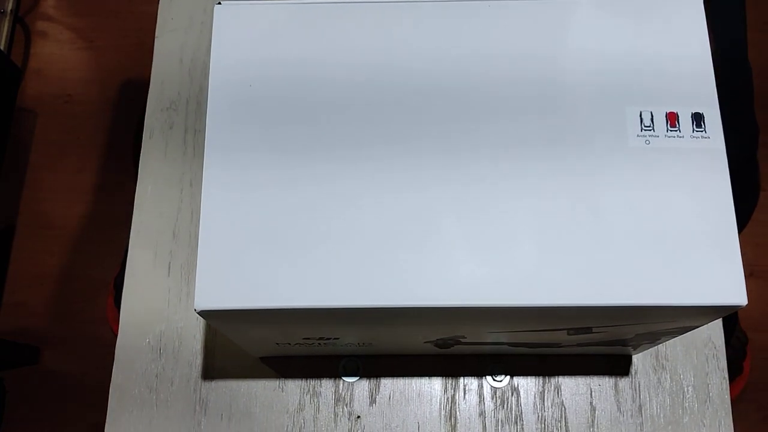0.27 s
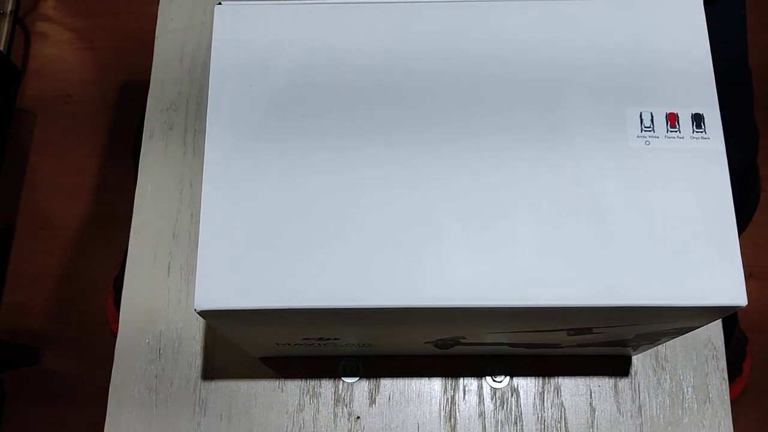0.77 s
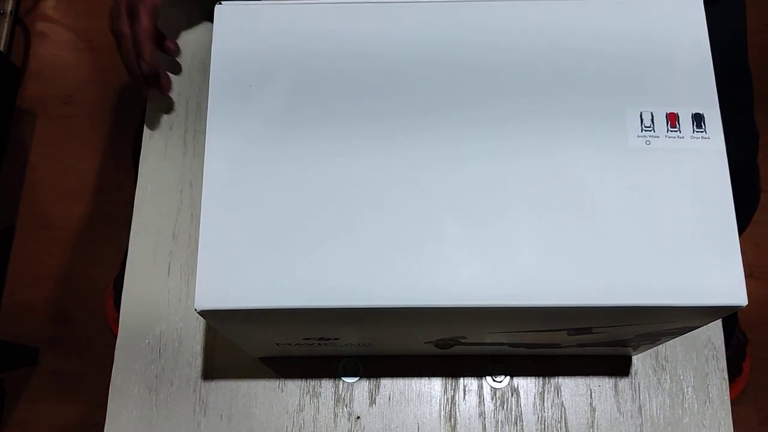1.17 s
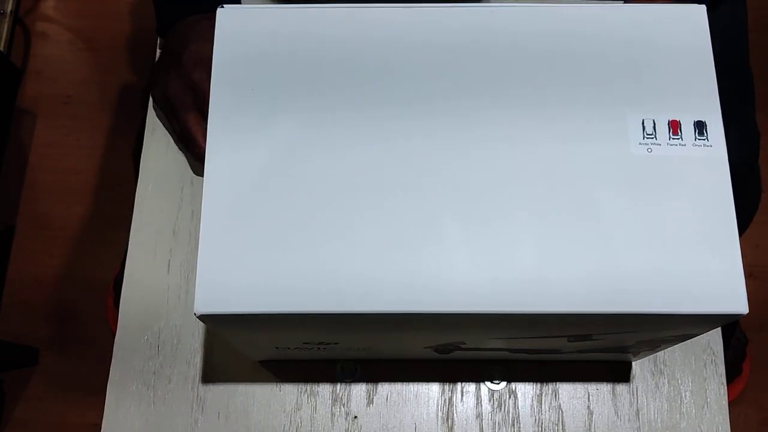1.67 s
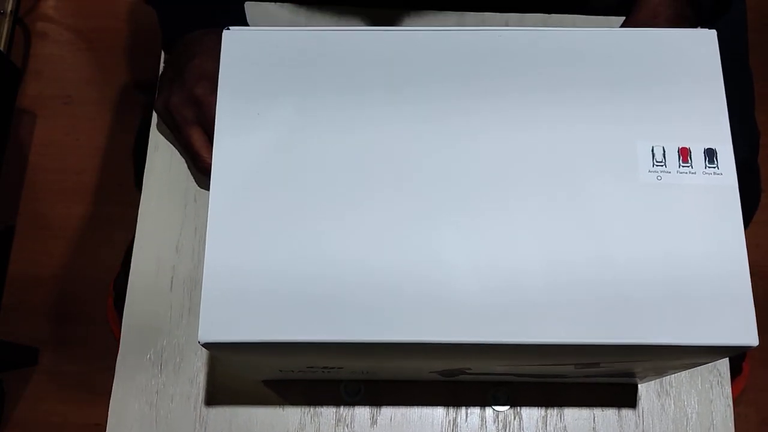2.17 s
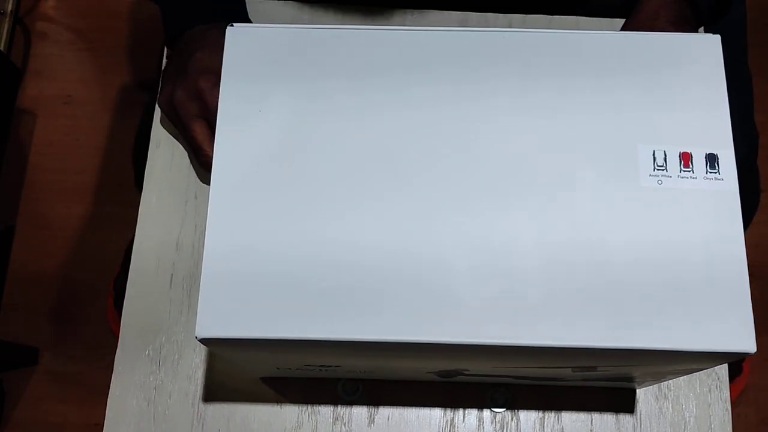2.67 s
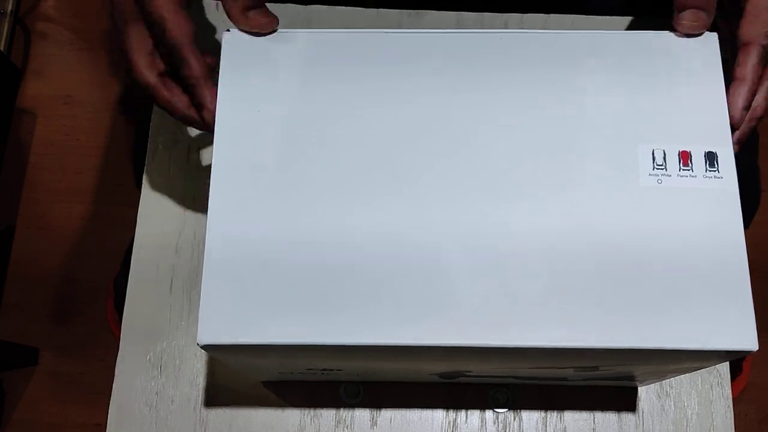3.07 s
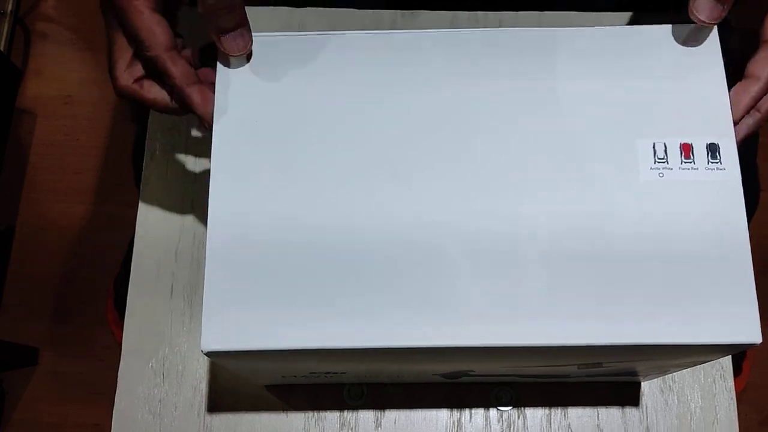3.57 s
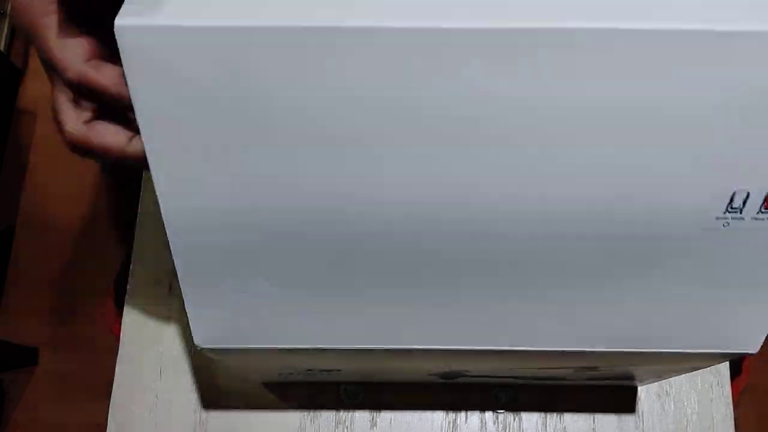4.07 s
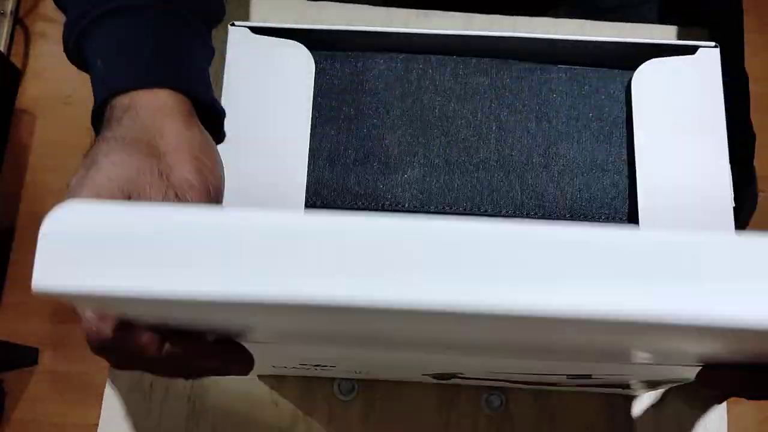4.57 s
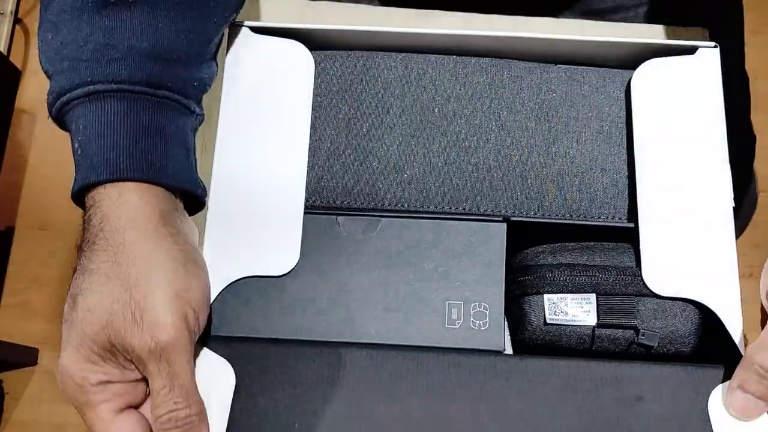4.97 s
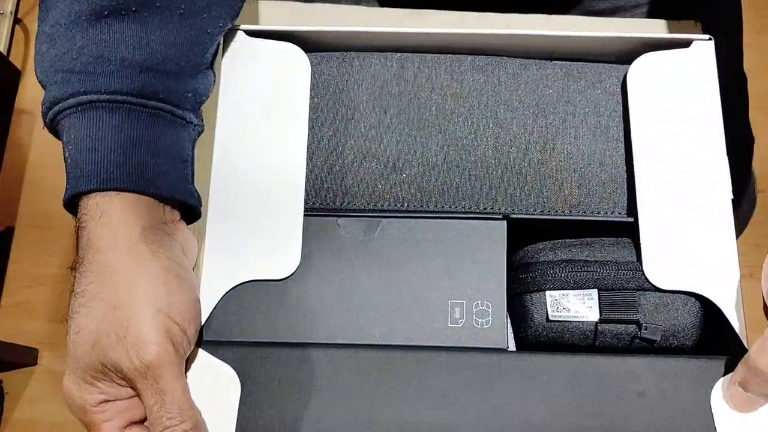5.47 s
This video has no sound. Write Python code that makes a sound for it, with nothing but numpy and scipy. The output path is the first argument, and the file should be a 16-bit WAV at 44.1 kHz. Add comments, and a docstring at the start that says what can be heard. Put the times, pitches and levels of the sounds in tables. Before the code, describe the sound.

Hands knock, slap and rub a hollow cardboard box in a quiet room, with one loud crackling burst of blows as the lid comes free.

```python
"""Hands knock, slap and slide on a hollow cardboard box in a quiet furnished room, close to a phone microphone.
Knocks at 0.1 s and a sharp slap near 0.3 s lead to faint rubbing, a lone knock at 2 s and stronger rubbing
from 2.7 s; the loudest burst of blows comes at 3.7 s, then scattered knocks and strokes, a hollow thud at 5.2 s
and two last rubs. Blows ring box modes under cracks of noise; strokes are stuttering friction noise; paper snaps
are short pitched puffs. A decaying tail of taps is the room, over steady drifting room tone."""
import sys
import numpy as np
from scipy import signal
from scipy.fft import rfft, irfft, next_fast_len
from scipy.io import wavfile
from scipy.ndimage import uniform_filter1d

SR = 44100
rng = np.random.default_rng(int(sys.argv[2]) if len(sys.argv) > 2 else 0)


def master_out(mix):
    """Clip the mix to full scale and print it as 16-bit PCM to the path in sys.argv[1]."""
    frames = np.transpose(np.atleast_2d(mix))
    ceiling = np.clip(frames, -1, 1)
    pcm = np.round(ceiling * 32767).astype(np.int16)
    wavfile.write(sys.argv[1], SR, pcm)


N = 252693  # length in samples


def gain_of(db):
    """Level law: decibels to an amplitude factor."""
    return 10 ** (np.asarray(db) / 20)


def evened(x):
    """Power normalisation: scales to rms 1."""
    return x / np.sqrt(np.mean(x ** 2) + 1e-20)


def read(points, hz):
    """Interpolation on a logarithmic frequency axis, as pitch is heard."""
    f, value = np.transpose(points)
    return np.interp(np.log(hz + 1), np.log(f + 1), value)


def add(mix, s, sound):
    """Superposition: mixes a sound in at time s."""
    part = mix[round(s * SR):][:len(sound)]
    part += sound[:len(part)]


def coloured(x, points, tilt_db=0.):
    """Spectral shaping: filters x to a spectrum, tilted in dB an octave about 3 kHz, rms 1."""
    size = next_fast_len(len(x))
    hz = np.fft.rfftfreq(size, 1 / SR)
    shape_db = read(points, hz) + tilt_db * np.log2((hz + 100) / 3000)
    return evened(irfft(rfft(x, size) * gain_of(shape_db), size)[:len(x)])


def ring(x, hz, t60):
    """Damped resonance: one mode, in which a click of height 1 rings at height 1."""
    radius = 10 ** (-3 / (t60 * SR))
    w = 2 * np.pi * hz / SR
    return signal.lfilter([0, np.sin(w)], [1, -2 * radius * np.cos(w), radius * radius], x)


def rung(force, hz, t60):
    """Forced resonance: a mode rung by a force, peak 1."""
    x = ring(force, hz, t60)
    return x / abs(x).max()


def through(x, modes):
    """Modal superposition: steady drive of a set of modes, rms 1."""
    return evened(sum(gain_of(db) * evened(ring(x, hz, t60)) for hz, db, t60 in modes))


# spectrum of the room tone: pitch_hz [Hz], level_db [dB per Hz, relative]
AIR = [(25, -31.5), (60, -17.5), (115, 3.5), (200, -10), (300, -9), (500, -14), (800, -21), (1500, -25),
       (3000, -28.5), (6500, -31.5), (7300, -37.5), (8000, -48), (15500, -38.5), (16500, -52)]
AIR_DB = -59.5  # rms level


def air():
    """Stationary noise: room tone whose level drifts in patches of time and frequency."""
    frames, hz = N // 256 + 5, np.fft.rfftfreq(1024, 1 / SR)
    real, imag, patches = rng.standard_normal((frames, 513, 3)).T
    patches = uniform_filter1d(patches, size=10, axis=0)  # over frequency
    patches = evened(uniform_filter1d(patches, size=12, axis=1))  # over time
    level_db = read(AIR, hz)[:, None] + 1.5 * patches
    z = (real + 1j * imag) * gain_of(level_db)
    tone = signal.istft(z, nperseg=1024, noverlap=768)[1][:N]
    return gain_of(AIR_DB) * evened(tone)


# decay of the furnished room: pitch_hz [Hz], t60_s [s]
ROOM = [(150, 0.13), (1000, 0.059), (4000, 0.023), (12000, 0.36)]


def room(x):
    """Reverberation: sparse taps of random sign, each band decaying exponentially at its own speed."""
    taps = np.zeros(SR // 2)
    at = np.arange(200, len(taps) - 20, 20)
    jitter = rng.integers(0, 20, len(at))
    taps[at + jitter] = rng.choice([-1., 1.], len(at))
    hz, t, z = signal.stft(taps, SR, nperseg=256)
    decay_db = -60 * t / read(ROOM, hz)[:, None]
    tail = signal.istft(z * gain_of(decay_db), SR, nperseg=256)[1]
    return signal.fftconvolve(x, tail / np.linalg.norm(tail))[:N]


def snap(db, hz, t60):
    """Stress release: a fibre lets go in a short puff with one broad pitch."""
    t = np.arange(SR // 8) / SR
    noise = rng.standard_normal(len(t))
    pitched = evened(ring(ring(noise, hz, .0022), hz, .0022))
    puff = evened(.4 * coloured(noise, CRACK) + pitched)
    rise = np.minimum(t / .001, 1)
    return gain_of(db - 60 * t / max(t60, .004)) * rise * puff


# small snaps of the paper face: start_s [s], level_db [dB], pitch_hz [Hz], t60_s [s]
SNAPS = [(.2551, -40, 6400, .012), (.426, -38.5, 4460, 0.076), (0.4933, -43.5, 5800, .02),
         (0.6833, -51.5, 4600, .021), (.9394, -58.5, 3350, .025), (1.1125, -51.5, 1700, .025),
         (1.727, -49.5, 2100, .023), (1.973, -44, 5500, .06), (2.17, -54.5, 6140, .018),
         (2.758, -52, 6340, .015), (3.101, -50, 6560, .029), (3.4706, -40.5, 6640, .025),
         (3.5771, -37, 4600, .023), (3.5958, -34, 4400, .02), (4.0796, -46, 3440, .03),
         (4.3994, -47, 2240, .022), (4.5323, -47, 6340, .025), (5.31, -45.5, 5700, .027),
         (5.6245, -54, 5270, .03)]


def snaps(mix):
    """Superposition of independent stress releases in the paper face."""
    for s, *how in SNAPS:
        add(mix, s, snap(*how))


def grit(lumpy_db, catch_s):
    """Stick-slip friction: noise whose strength stutters as fibres catch and let go."""
    stutter = evened(uniform_filter1d(rng.standard_normal(N), max(round(catch_s * SR), 1)))
    return rng.standard_normal(N) * gain_of(lumpy_db * stutter)


STROKE_DEPTH_DB = 30  # a stroke climbs this much in its rise and loses it in its fall
RISE_BEND, FALL_BEND = 1.1, 1.05  # exponents of the slopes in dB


def stroke(t, start, rise, hold, fall):
    """Amplitude envelope: one stroke rises, holds, and dies away."""
    before = np.clip(1 - (t - start) / max(rise, .001), 0, 9)
    after = np.clip((t - start - rise - hold) / max(fall, .001), 0, 9)
    return gain_of(-STROKE_DEPTH_DB * (before ** RISE_BEND + after ** FALL_BEND))


CAVITY_HZ, CAVITY_T60 = 122, 0.12  # the air inside; t60 in s, under a blow
RUB_BOOM_DB = -22  # its hum under the hiss of a sliding hand
# skin on paper: pitch_hz [Hz], level_db [dB per Hz, relative]
HISS = [(470, -50), (800, -23), (1440, -31), (1880, -26.5), (2570, -24), (3220, -11), (5720, 3.5),
        (6330, 6), (7450, -6.5), (8030, -20), (12100, -23.5), (15000, -22.5), (16000, -31.5)]
# board edge on board: pitch_hz [Hz], level_db [dB per Hz, relative]
DRAG = [(60, -28), (130, -4), (350, 4), (700, -0.5), (1200, -3.5), (1500, -6.5), (2200, -4), (2700, -6),
        (6300, -15.5), (8000, -36.5), (16000, -60)]
# modes of a loose flap: pitch_hz [Hz], level_db [dB, relative], t60_s [s]
BUZZ = [(3070, -6, 0.014), (3330, -1.5, .008), (3810, -1, 0.0053)]
# strokes of hand and board: start_s [s], rise_s [s], hold_s [s], fall_s [s],
# skin_hiss_db [dB], board_drag_db [dB], flap_buzz_db [dB]
STROKES = [(0.24, 0.014, 0.019, 0.017, -31.5, -56.5, -52.5), (0.27, 0.0083, 0.07, 0.064, -30, -25.5, -30),
           (0.387, 0.028, 0.0012, 0.53, -64, -63, -63), (0.65, 0.038, .001, 0.081, -62, -67, -79),
           (1.22, 0.092, 0.07, 0.18, -53, -61, -68.5), (1.487, 0.042, 0.082, 0.058, -47.5, -57, -62.5),
           (1.676, 0.086, .005, 0.058, -61.5, -48.5, -59.5),
           (1.988, 0.003, 0.022, 0.073, -37.5, -41, -44.5), (2.056, 0.023, 0.11, .08, -75, -67, -77),
           (2.737, 0.038, 0.06, 0.078, -44, -57.5, -59), (2.876, 0.0066, 0.0012, 0.051, -38.5, -46.5, -49),
           (3.103, 0.052, 0.014, 0.073, -38, -36.5, -59.5), (3.123, 0.079, 0.066, 0.063, -28, -49, -51),
           (3.318, 0.034, .001, 0.027, -45.5, -54, -66), (3.325, 0.096, 0.043, 0.058, -52, -54, -60),
           (3.519, 0.061, 0.012, 0.036, -41.5, -53, -51.5), (3.606, 0.045, 0.022, .03, -48.5, -35.5, -41),
           (3.642, .05, 0.0054, 0.0094, -26.5, -28.5, -28.5), (3.692, 0.0077, 0.03, 0.083, -24, -30, -20.5),
           (3.769, 0.0089, .001, 0.13, -34.5, -26, -37), (3.857, 0.0094, 0.058, .06, -55, -71, -48.5),
           (3.983, 0.1, 0.00087, .08, -57, -55, -55.5), (4.105, 0.032, .001, 0.017, -43.5, -42, -56.5),
           (4.224, 0.027, .001, 0.073, -63, -50, -46.5), (4.25, 0.039, 0.13, 0.022, -54.5, -58, -56.5),
           (4.414, 0.032, .001, 0.12, -33, -37.5, -41), (4.467, 0.071, .001, 0.071, -36, -56, -75),
           (4.519, .075, 0.033, 0.2, -27, -53, -45), (4.66, 0.025, .001, 1, -87, -56.5, -55.5),
           (5.062, 0.056, .07, 0.016, -64, -74, -95), (5.197, 0.013, 0.021, 0.045, -78, -45.5, -48),
           (5.219, 0.031, 0.023, 0.16, -60, -50, -60), (5.443, 0.033, 0.041, 0.05, -47, -60.5, -57.5),
           (5.599, 0.035, 0.078, 0.032, -41.5, -60, -60.5)]


def strokes():
    """Friction-driven vibration: skin hisses on paper, board drags and drives the box modes, a flap buzzes."""
    t, level = np.arange(N) / SR, np.zeros((3, N))
    for start, rise, hold, fall, *layers_db in STROKES:
        level += gain_of(layers_db)[:, None] * stroke(t, start, rise, hold, fall)
    hiss = coloured(grit(lumpy_db=2.04, catch_s=0.00094), HISS)
    scrape = grit(lumpy_db=3.0, catch_s=0.0024)
    drag = coloured(evened(scrape) + 0.16 * through(scrape, BOX), DRAG)
    buzz = through(grit(lumpy_db=2.0, catch_s=0.0033), BUZZ)
    hum = gain_of(RUB_BOOM_DB) * evened(ring(scrape, CAVITY_HZ, .05))
    return level[0] * (hiss + hum) + level[1] * drag + level[2] * buzz


CAVITY_DB = -14.5  # boom relative to the large panel's level
TILT_DB, NEUTRAL_HZ = 6, 4060  # a higher crack is brighter: dB an octave for each octave above neutral
HAND_DB_PER_S, HAND_DB = 1500, 17  # how fast and how far the hand damps the board
# panels and air of the box: pitch_hz [Hz], level_db [dB, relative], t60_s [s]
BOX = [(190, 0, .13), (240, 0, .1), (268, 0, .12), (318, 0, .13), (385, 0, .11), (515, 0, .19),
       (650, -2, .08), (780, 0, .12), (845, 0, .12), (975, 0, .08), (1160, 0, .12), (1215, 0, .12),
       (1480, -2, .07), (1700, -2, .08)]
# crack of the board: pitch_hz [Hz], level_db [dB per Hz, relative]
CRACK = [(200, -30), (600, -4.5), (1200, -6), (2140, -22), (3030, 0), (3500, -4.5), (5300, -5),
         (6300, -4.5), (7300, -14), (8100, -23.5), (9100, -21.5), (16000, -32.5)]


def blow(crack_db, crack_hz, t60, panel_db, panel_hz, flap_db, flap_hz, contact, free):
    """Impact excitation: a rough contact rings the modes nearest panel and flap; a crack of noise dies on top."""
    t = np.arange(SR // 3) / SR
    contact = np.clip(contact, .0003, .03)
    force = rng.standard_normal(len(t)) * t * np.exp(-t * 2 / contact)
    struck_hz, struck_db = np.array([panel_hz, flap_hz]), np.array([panel_db, flap_db])
    modes = 0
    for hz, db, mode_t60 in BOX:
        # modes far from the struck pitch barely move
        away_db = -6 * (np.log2(hz / struck_hz) / 0.06) ** 2
        away_db = np.maximum(away_db, -26)
        strength = gain_of(db + struck_db + away_db).sum()
        modes += strength * rung(force, hz, mode_t60)
    boom = gain_of(panel_db + CAVITY_DB) * rung(force, CAVITY_HZ, CAVITY_T60)
    # the hand settles on the board and damps it
    damped_db = -np.clip((t - free) * HAND_DB_PER_S, 0, HAND_DB)
    noise = rng.standard_normal(len(t))
    tilt_db = TILT_DB * np.log2(crack_hz / NEUTRAL_HZ)
    pitched = evened(ring(noise, crack_hz, 0.0062))
    crack = evened(coloured(noise, CRACK, tilt_db) + 0.78 * pitched)
    rise = np.minimum(t / contact, 1)
    crack_gain = gain_of(crack_db - 60 * t / max(t60, .004)) * rise
    return gain_of(damped_db) * (modes + boom) + crack_gain * crack


# blows: start_s [s], crack_db [dB], crack_hz [Hz], crack_t60_s [s], panel_db [dB], panel_hz [Hz],
# flap_db [dB], flap_hz [Hz], contact_s [s, played within 0.0003 to 0.03],
# free_ring_s [s, until the hand settles on the board]
BLOWS = [(0.1031, -25, 4300, 0.024, -14.5, 275, -22.5, 1010, 0.00098, 0.051),
         (0.109, -29, 4340, 0.043, -21.5, 320, -15.5, 890, 0.0057, 0.0093),
         (0.1172, -32.5, 4530, 0.077, -14.5, 215, -19, 1320, 0.0024, 0.011),
         (0.1315, -40, 5540, 0.18, -17.5, 310, -32, 817, .0015, 0.014),
         (0.2782, -7.5, 6780, 0.068, -22, 513, -52, 750, 0.00096, 0.04),
         (0.3064, -17, 2870, 0.043, -21.5, 326, -21.5, 1450, 0.0021, 0.048),
         (0.3337, -22.5, 6050, 0.038, -24, 200, -27, 1370, 0.0024, 0.015),
         (1.41, -42, 3956, .058, -53, 1700, -53, 1480, 0.015, 0.044),
         (1.7622, -49.5, 2526, 0.062, -46.5, 371, -59.5, 800, 0.0036, 0.014),
         (1.9832, -24.5, 4300, .056, -30, 375, -29, 670, 0.0027, 0.043),
         (2.8752, -31.5, 6270, 0.029, -50, 258, -61.5, 666, .0016, .02),
         (3.1413, -35, 6640, .04, -28, 656, -34, 1190, 0.004, 0.049),
         (3.629, -23.5, 2070, 0.45, -45.5, 650, -44, 1510, 0.042, 0.033),
         (3.6970, -5.5, 6440, 0.04, -51, 520, -19, 1170, 0.001, 0.0083),
         (3.7041, 2, 3400, 0.0093, -47, 497, -17, 1210, 0.0014, 0.011),
         (3.7164, -13.5, 6560, 0.045, -45, 500, -19.5, 1140, 0.0063, 0.05),
         (3.7419, -11, 3230, 0.049, -29, 520, -11, 833, .0008, .004),
         (3.7493, -12, 2720, 0.058, -9.5, 317, -15, 1000, 0.002, .03),
         (3.769, -30, 2820, .054, -13.5, 236, -45, 628, 0.00095, .064),
         (3.7947, -29, 3300, 0.16, -17, 251, -27.5, 780, 0.0026, 0.016),
         (4.0024, -50.5, 3120, 0.075, -42, 190, -53, 840, 0.0021, 0.023),
         (4.1348, -25, 3830, 0.14, -25, 304, -32, 865, 0.0023, 0.023),
         (4.1444, -24, 3520, 0.044, -35.5, 385, -20.5, 1121, 0.003, 0.014),
         (4.166, -47.5, 3800, 0.12, -35.5, 382, -38, 820, 0.0046, 0.046),
         (4.2050, -18, 3240, 0.045, -27, 320, -21, 750, 0.0044, 0.029),
         (4.2123, -17, 3530, 0.096, -13, 820, -35.5, 1150, 0.00032, 0.013),
         (4.2307, -30, 3400, 0.043, -29.5, 329, -42, 510, 0.0019, 0.061),
         (4.4339, -20, 5030, 0.034, -24.5, 321, -20, 752, 0.0016, 0.042),
         (5.1985, -35, 3435, .03, -12, 517, -37, 1170, 0.0021, 0.028),
         (5.205, -39, 3380, 0.15, -26, 190, -20, 330, 0.0077, 0.018)]


def blows(mix):
    """Superposition of impacts, each ringing the box afresh."""
    for s, *how in BLOWS:
        add(mix, s, blow(*how))


RADIATES_HZ = 101  # lower limit of the box's radiation


def scene():
    """Linear superposition: strokes, blows and snaps, their reverberation, and the room tone."""
    box = strokes()
    blows(box)
    snaps(box)
    # a small box cannot radiate below its cavity
    box = signal.sosfilt(signal.butter(4, RADIATES_HZ, "highpass", fs=SR, output="sos"), box)
    return (box + gain_of(-13.0) * room(box) + air())[None]


BASS_CUT_HZ, EDGE_HZ = 77, 16000  # pass band of the microphone and converter


def record(dry):
    """Band limiting and saturation: the deep bass drops, full scale clips, then the treble is cut off."""
    thin = signal.sosfilt(signal.butter(2, BASS_CUT_HZ, "highpass", fs=SR, output="sos"), dry)
    edge = signal.firwin(1023, EDGE_HZ, window=("kaiser", 13), fs=SR)
    return signal.oaconvolve(np.clip(thin, -1, 1), edge[None], "same")


dry = scene()
out = record(dry)
master_out(out)
```